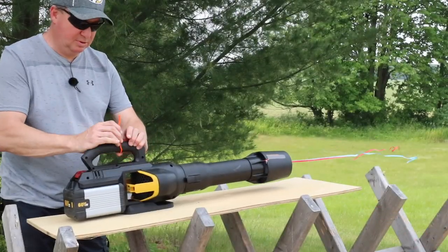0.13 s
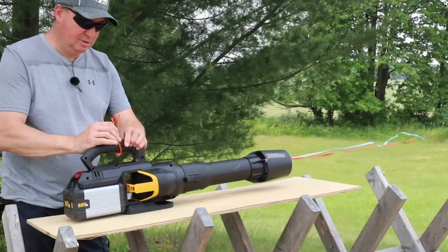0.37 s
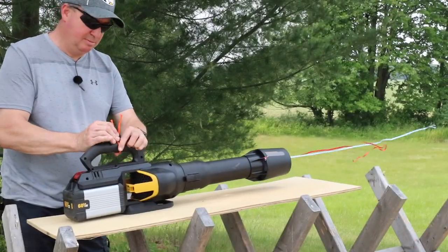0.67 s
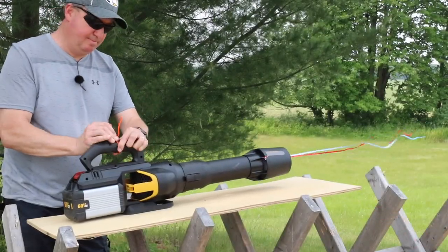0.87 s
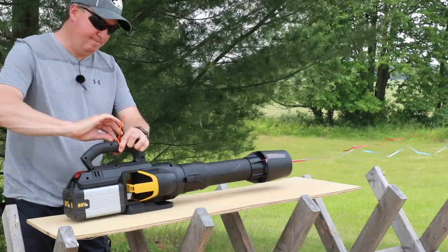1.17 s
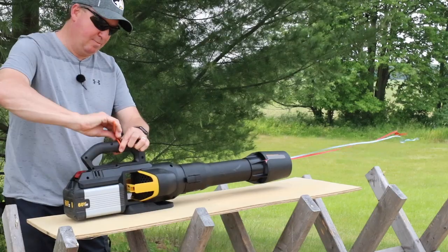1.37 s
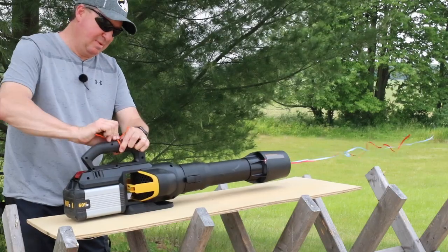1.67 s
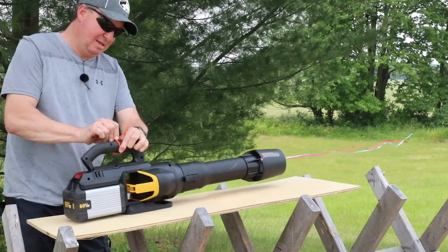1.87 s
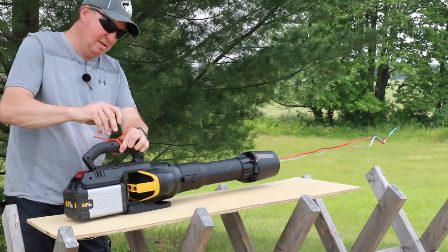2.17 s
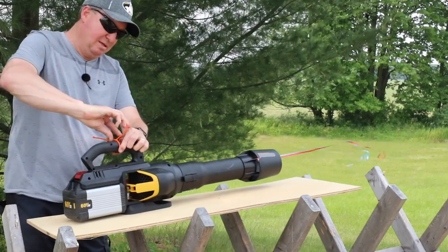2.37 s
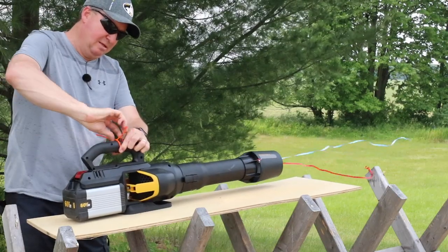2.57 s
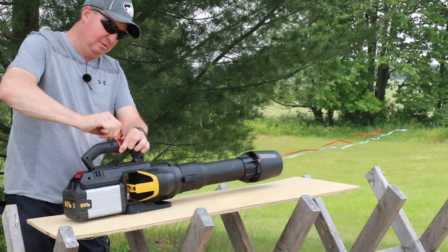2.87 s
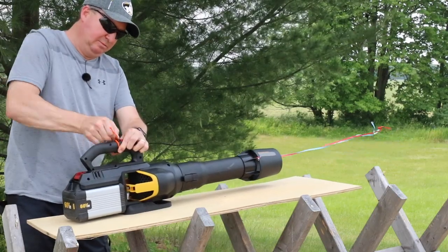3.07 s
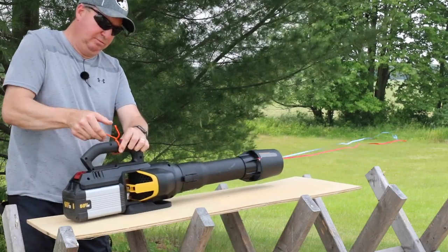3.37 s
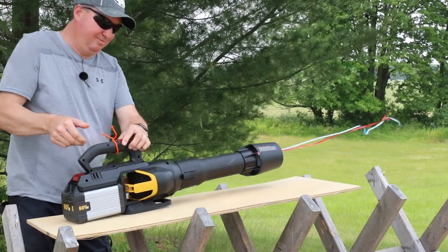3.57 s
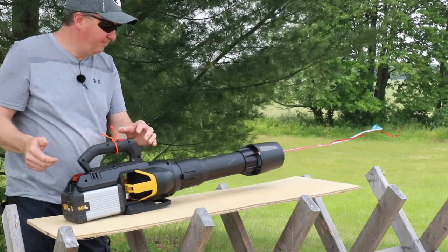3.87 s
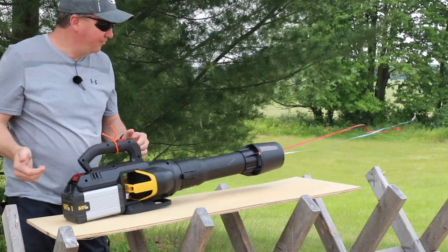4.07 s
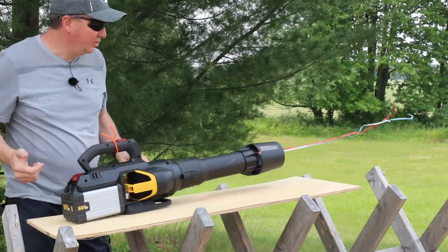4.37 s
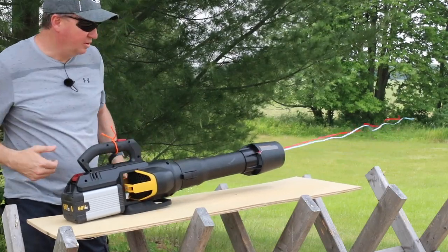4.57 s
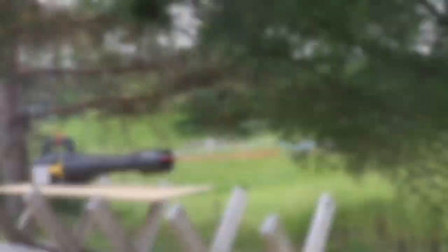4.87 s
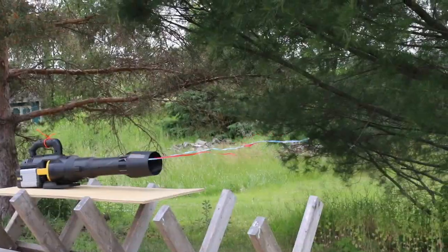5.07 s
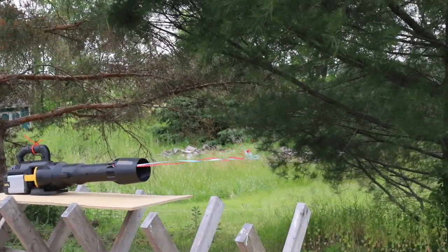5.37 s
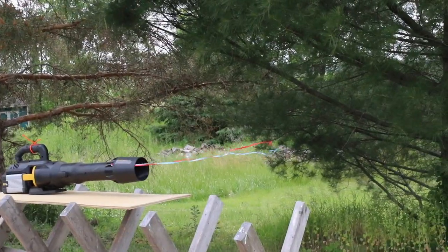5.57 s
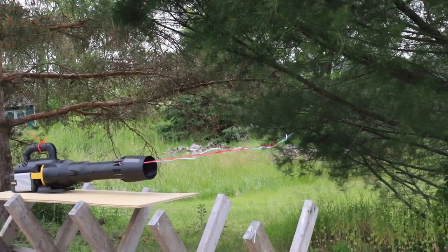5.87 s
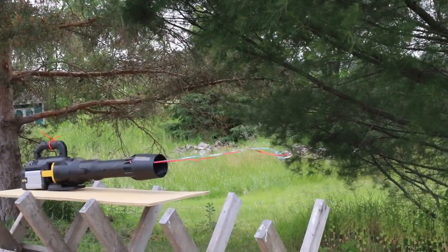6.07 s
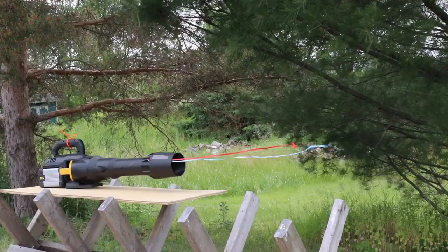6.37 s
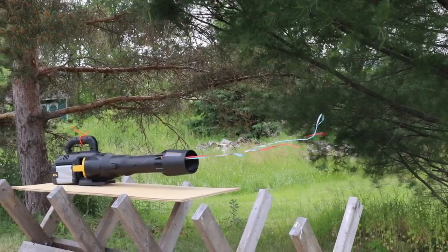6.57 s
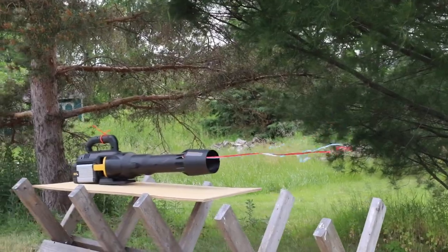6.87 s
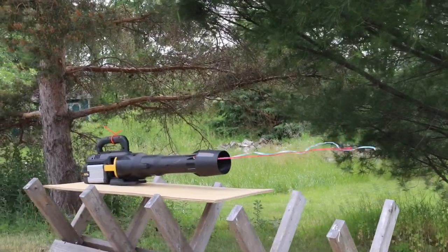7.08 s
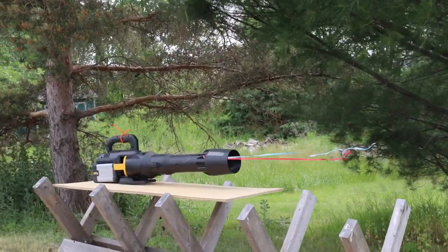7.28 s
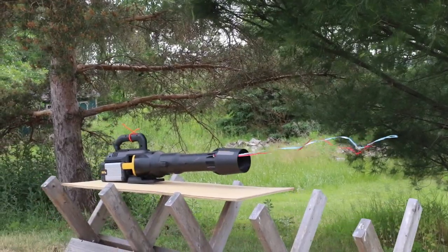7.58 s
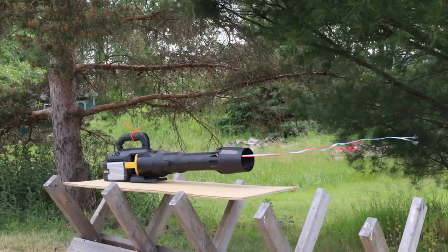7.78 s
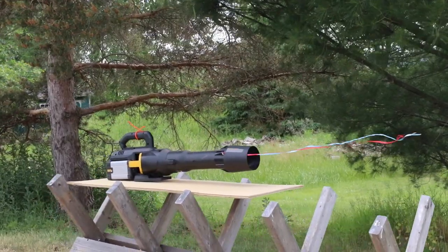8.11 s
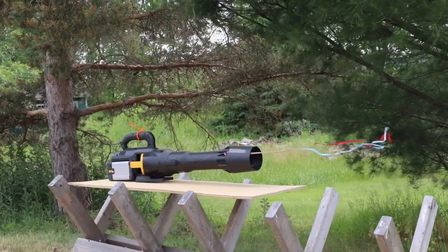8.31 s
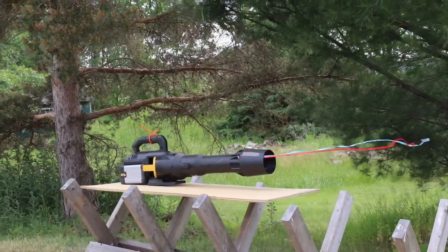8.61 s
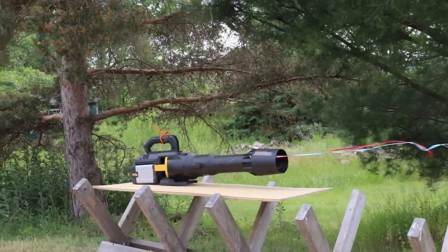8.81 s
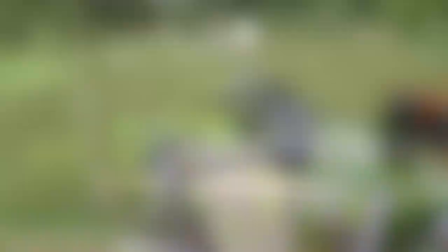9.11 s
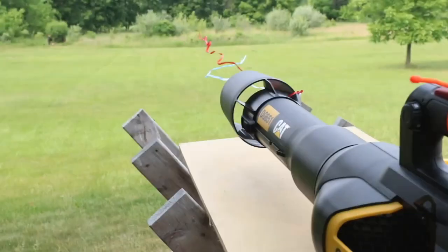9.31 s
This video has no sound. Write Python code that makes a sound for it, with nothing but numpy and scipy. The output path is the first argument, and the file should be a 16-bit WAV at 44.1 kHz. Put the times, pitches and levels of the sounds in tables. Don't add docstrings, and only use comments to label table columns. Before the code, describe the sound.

Constant full-speed blower noise in an open yard: broad roar, jet-like rush and bright hiss, with a whistling electric fan tone near 4.5 kilohertz. The first half is close and loud, the whine fluttering. Then the microphone perspective softens to the side, noticeably quieter, the whine faint and wavering over the air. It fades into a brief, fuller view from behind. A weak faraway engine note wavers underneath; no start or stop.

```python
import sys
import numpy as np
from scipy import signal
from scipy.fft import rfft, irfft
from scipy.io import wavfile
from scipy.ndimage import uniform_filter1d

SR = 44100
rng = np.random.default_rng(int(sys.argv[2]) if len(sys.argv) > 2 else 0)


def generate_wav(sig):
    pcm = np.round(np.clip(np.atleast_2d(sig).T, -1, 1) * 32767).astype(np.int16)
    wavfile.write(sys.argv[1], SR, pcm)


def boost_factor(decibels):
    exponent = np.asarray(decibels, float) / 20
    return 10 ** exponent


N = 416744
TIME = np.arange(N) / SR


def curves(table, t):
    s, *columns = np.transpose(table)
    return [np.interp(t, s, c) for c in columns]


def bell(x, middle, width):
    return np.exp(-np.log(2) * (2 * (x - middle) / width) ** 2)


def humps(t, rows):
    return sum(size * bell(t, middle, length) for middle, length, size in rows)


def walk(rate, t):
    hold = int(SR / rate)
    steps = rng.standard_normal(size=600)[np.arange(len(t)) // hold]
    return 1.35 * uniform_filter1d(uniform_filter1d(steps, hold), hold)


def tone(t, turns, db, scatter, wobble):
    eddies = walk(75, t) + 1j * walk(75, t)
    drift = walk(8, t)
    size = (1 + scatter * eddies) / np.sqrt(1 + 2 * scatter ** 2)
    wave = np.imag(size * np.exp(1j * (2 * np.pi * turns + wobble * drift)))
    return np.sqrt(2) * boost_factor(db) * wave


# (start [s], end [s])
SPOTS = [
    (0, 4.6),
    (5.0, 9.0),
    (9.26, 9.45),
]


def glide(t, k, start, end):
    return np.interp(t, SPOTS[k], (start, end))


# (time [s], frequency [Hz], level [dB])
DRONE = [
    [(0, 690, -45), (.35, 694, -45), (.55, 672, -43), (1.0, 657, -42), (1.9, 647, -42), (2.3, 624, -46),
     (4.6, 596, -54)],
    [(4.9, 510, -47), (5.25, 515, -54), (5.4, 512, -43), (6.2, 495, -47), (6.4, 510, -48), (7.6, 505, -48),
     (9.1, 490, -50)],
]


def drone(t, k):
    hz, db = curves(DRONE[k], t)
    hz = hz + 5 * walk(11, t)
    db = db + 2 * walk(9, t)
    return tone(t, np.cumsum(hz) / SR, db + 1, scatter=.45, wobble=1.2)


# (frequency [Hz], spectral level [dB per Hz])
AIR = [
    [(25, -35), (60, -24), (160, -11), (230, -11), (330, -1.5), (520, -5.5), (900, -10.5), (1400, -11.5),
     (2200, -3.5), (4000, -4.5), (6300, -7), (8300, -14), (12000, -17), (15700, -27)],
    [(25, -32), (60, -23), (160, -17.5), (230, -11.5), (330, -5), (520, -1), (900, -3), (1400, -14),
     (2200, -11), (4000, -8.5), (6300, -8.5), (8300, -18), (12000, -30.5), (15700, -37)],
    [(25, -35), (60, -29.6), (160, -19), (230, -8), (330, -9), (520, 2), (900, -6), (1400, -13),
     (2200, -12), (4000, -5.5), (6300, -9), (8300, -18), (12000, -25), (15700, -26.6)],
]
# (start frequency [Hz], end frequency [Hz], width [Hz], level over the colour [dB])
DUCT = [
    [(315, 315, 90, 5), (1100, 1100, 150, 2.5), (1300, 1250, 250, -3), (1700, 1700, 250, 2.5),
     (1980, 1980, 250, 2.5), (2550, 2550, 200, 2.5), (3250, 3250, 200, 2), (4100, 4200, 650, 5.5),
     (4380, 4370, 160, 2), (4700, 4700, 200, -2), (5000, 5000, 350, -2), (5700, 5800, 600, 2.5)],
    [(850, 850, 150, 2), (1050, 1050, 100, -2), (1500, 1500, 150, 2), (1850, 1850, 150, -3),
     (2100, 2120, 220, 3), (2700, 2750, 280, 4), (3450, 3510, 370, 8.5), (4350, 4350, 200, 2.5),
     (4760, 4720, 180, 3.5), (5950, 5150, 350, 6.5), (8200, 8200, 400, -5), (9000, 9000, 600, 2)],
    [(1650, 1650, 300, -4), (2550, 2550, 250, 3), (3200, 3200, 200, 3), (4300, 4300, 400, 3),
     (5100, 5100, 400, -5), (6100, 6100, 600, 4), (7300, 7300, 400, -4)],
]


def duct_colour(hz, s, k):
    points_hz, points_db = np.transpose(AIR[k])
    colour_db = np.interp(np.log(hz), np.log(points_hz), points_db)[:, None]
    for start, end, width, db in DUCT[k]:
        colour_db = colour_db + db * bell(hz[:, None], glide(s, k, start, end), width)
    return colour_db


# (low edge [Hz], high edge [Hz])
RUSH_BANDS_HZ = [
    (200, 1200),
    (1500, 3500),
    (5000, 8500),
    (9500, 13000),
]
# (roar [dB], jet [dB], hiss [dB], sizzle [dB])
RUSH = [
    (-32.5, -31, -31.5, -36),
    (-41.5, -40, -43.5, -49),
    (-38.5, -36, -38.5, -48),
]
# (time [s], level [dB])
LEAN = [(0, 3), (.75, 1.5), (1.15, 2.5), (1.55, 0), (3.05, .5), (3.8, 0), (4.25, -0.5), (4.6, 1),
        (4.9, 0.7), (9.45, 0.4)]
LEAN_SHARES = (.1, 1.14, 0.35, 0.83)


def band_gains(hz, s, k, colour_db):
    lean_db = curves(LEAN, s)[0]
    gains_db = []
    for (lo, hi), db, share in zip(RUSH_BANDS_HZ, RUSH[k], LEAN_SHARES):
        inside = (hz > lo) & (hz < hi)
        power = np.sum(boost_factor(2 * colour_db[inside]), axis=0) * hz[1] / SR
        gains_db.append(db + share * lean_db - 10 * np.log10(2 * power))
    centres = np.log([np.sqrt(lo * hi) for lo, hi in RUSH_BANDS_HZ])
    return np.array([np.interp(np.log(hz), centres, g) for g in np.array(gains_db).T]).T


# (middle [s], length [s], frequency [Hz], width [Hz], level [dB])
SHADES = [(.5, 1.3, 3770, 480, 3.5), (.5, 1.9, 5150, 890, 4), (4, 1.7, 3400, 500, -1),
          (2.5, 2.3, 840, 140, 6), (4.2, 0.68, 1460, 250, 7), (2.6, 1.2, 10940, 800, 4.5),
          (4.44, 0.77, 10800, 870, -11), (4.3, .8, 12400, 900, -9), (4.35, 1.1, 110, 150, -4.5),
          (4.4, .8, 7350, 840, -5), (5.9, 1.2, 6900, 500, -7.5), (6.8, 0.57, 7260, 500, 6),
          (6.1, 1.6, 11200, 660, -4), (5.5, 1.2, 13600, 400, -4), (8.1, 1.8, 14100, 500, -4),
          (9.1, .6, 11700, 500, -6), (5.8, 1.5, 9700, 620, 3.5), (7.4, 1.4, 11300, 800, 5.5),
          (10.5, 0.9, 2480, 520, 2), (8, 2.9, 1820, 200, 2.5), (8.5, 1.8, 5250, 380, -6.5),
          (3.2, 2.6, 4430, 470, 4.5), (8.55, 1.1, 2050, 160, 5), (17, 1.5, 4500, 200, 8)]


def shades(hz, s):
    return sum(db * np.outer(bell(hz, f, width), bell(s, middle, length))
               for middle, length, f, width, db in SHADES)


def rush(t, k):
    hz, s, cells = signal.stft(rng.standard_normal(len(t)), SR, nperseg=2048)
    s = s + t[0]
    hz[0] = hz[1]
    colour_db = duct_colour(hz, s, k)
    field_db = colour_db + band_gains(hz, s, k, colour_db) + shades(hz, s)
    patches = uniform_filter1d(rng.standard_normal(cells.shape), size=25, axis=0)
    patches = uniform_filter1d(patches, size=7, axis=1)
    field_db = field_db + .7 * patches / patches.std()
    return signal.istft(cells * boost_factor(field_db), SR, nperseg=2048)[1][:len(t)]


# (time [s], rate [turns per s])
SHAFT = [
    [(0, 373.1), (2.5, 371.42), (4.5, 370.9)],
    [(4.9, 363.44), (9.15, 363.3)],
    [(9.26, 361.6), (9.44, 361.68)],
]
# (middle [s], length [s], rise [turns per s])
NUDGES = [(.35, .3, .25), (1.75, .5, .15), (5.28, .25, .37), (6.46, .27, .34), (7.3, .3, .37),
          (7.75, .2, .17)]


def shaft_turns(t, k):
    rate = curves(SHAFT[k], t)[0] + humps(t, NUDGES)
    return np.cumsum(rate) / SR


# (multiple of the shaft [ratio], level [dB])
ORDERS_DB = [
    [(1, -50), (9, -56)],
    [(1, -52.5), (9, -50), (18, -70), (32, -65), (35, -69), (39, -76), (33, -75)],
    [(1, -54), (35, -58)],
]


def shaft_orders(t, turns, k):
    return sum(tone(t, round(order) * turns, db + 1.5 * walk(2, t), scatter=.4, wobble=.5)
               for order, db in ORDERS_DB[k])


WHINE_ORDERS = [
    12,
    24,
    36,
    40,
]
# (on arrival [dB], on leaving [dB])
WHINE = [
    [(-25, -26), (-37.5, -38), (-43, -46), (-50.5, -50)],
    [(-46, -46), (-63, -63), (-74, -60), (-52.5, -57.5)],
    [(-36, -34.5), (-42, -48), (-64, -62), (-44, -41.5)],
]
# (scattered share [ratio], phase wobble [rad], trim [dB])
WHINE_ROUGH = [
    (.45, .3, 1.2),
    (.22, .3, .6),
    (.15, .25, .3),
    (.2, .25, .6),
]
# (middle [s], length [s], level [dB])
SWEEPS = [
    [(.75, .42, -9), (2.0, 1.0, -5), (2.42, .13, -4), (3.0, .45, -6), (3.55, .11, -8), (4.03, .15, 3),
     (4.25, .15, -3), (4.75, .15, -5), (5.28, .15, 3), (5.9, .4, -11), (6.42, .25, 4), (6.9, .5, -3),
     (7.95, .8, 4), (8.85, .25, 5)],
    [(.7, .13, 4), (1.13, .17, 4.5), (1.62, .2, 5), (2.7, 1.2, 6), (4.55, .7, -12), (5.33, .4, 8),
     (6.8, .95, 15), (8.05, .35, 12), (8.92, .35, 10)],
    [(2.4, 2.8, 12.5), (4.3, .22, -13)],
    [(2.6, 2.1, 9.5), (9.12, .2, -8), (6.18, .3, 5), (8.05, .4, 5), (8.47, .25, -8)],
]
# (time [s], share [ratio])
EDDIES = [
    [(0, .6), (1.7, .65), (2, 1.35), (3.45, 1.3), (3.65, .7)],
    [(5, .5), (9, .5)],
    [(9.2, .6), (9.45, .6)],
]


def whine(t, turns, k):
    eddies = curves(EDDIES[k], t)[0]
    out = np.zeros(len(t))
    for order, ends_db, rough, sweeps in zip(WHINE_ORDERS, WHINE[k], WHINE_ROUGH, SWEEPS):
        scatter, wobble, trim_db = rough
        db = glide(t, k, *ends_db) + humps(t, sweeps) + trim_db
        out += tone(t, order * turns, db, eddies * scatter, wobble)
    return out


# (start [s], end [s])
FADES = [
    (4.655, 4.91),
    (9.1, 9.38),
]


def scene():
    first, second = (np.pi / 2 * np.clip((TIME - a) / (b - a), 0, 1) for a, b in FADES)
    shares = (np.cos(first), np.sin(first) * np.cos(second), np.sin(second) ** 1.5)
    mono = np.zeros(N)
    for k, share in enumerate(shares):
        heard = share > 1e-9
        t = TIME[heard]
        turns = shaft_turns(t, k)
        spot = rush(t, k) + shaft_orders(t, turns, k) + whine(t, turns, k)
        if k < len(DRONE):
            spot = spot + drone(t, k)
        mono[heard] += share[heard] * spot
    return np.array([mono, mono])


# (time [s], low edge [Hz], high edge [Hz])
FILLS = [(0.055, 10340.0, 12490.0), (1.914, 4130.0, 6290.0), (2.329, 5680.0, 8270.0),
         (2.656, 4650.0, 5680.0), (2.749, 8960.0, 10340.0), (2.843, 5680.0, 6890.0),
         (3.492, 11020.0, 13090.0), (3.494, 4650.0, 5680.0), (8.068, 6290.0, 7490.0),
         (8.321, 6370.0, 7580.0), (8.46, 13870.0, 15070.0), (8.533, 8270.0, 9650.0),
         (8.647, 13180.0, 14380.0), (8.811, 4650.0, 5680.0), (8.811, 9040.0, 10340.0),
         (8.88, 11110.0, 12320.0), (8.968, 5680.0, 6890.0), (8.971, 13180.0, 14380.0)]


def fills(mono):
    side, size = np.zeros(N), 2048
    hz = np.arange(size // 2 + 1) * SR / size
    for s, lo, hi in FILLS:
        start = int(s * SR) - size // 2
        phases = np.exp(2j * np.pi * rng.random(len(hz)))
        spectrum = np.abs(rfft(mono[start:start + size])) * phases
        band = (hz > lo) * (hz < hi)
        side[start:start + size] += irfft(spectrum * band) * np.hanning(size)
    return boost_factor(-3.5) * side


def top_cut(x):
    return signal.sosfilt(signal.butter(12, 15720, fs=SR, output="sos"), x)


def record(dry):
    side = fills(dry[0])
    mix = dry + np.array([side, -side])
    return top_cut(mix)


dry = scene()
out = record(dry)
generate_wav(out)
```